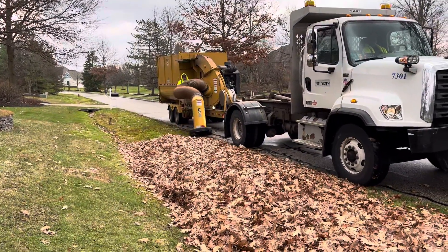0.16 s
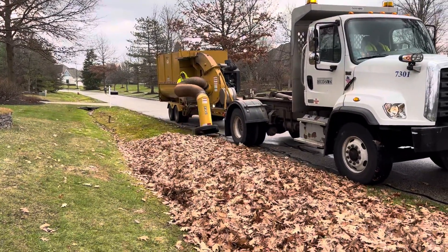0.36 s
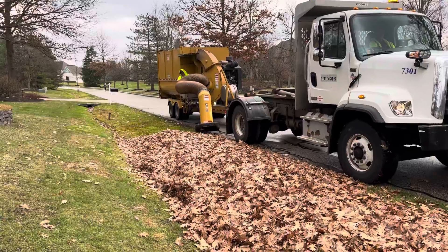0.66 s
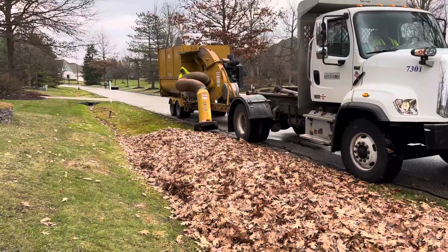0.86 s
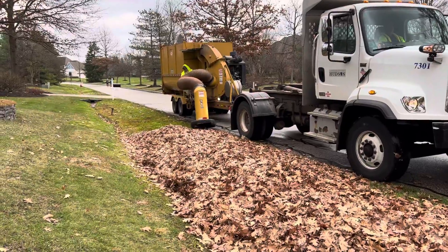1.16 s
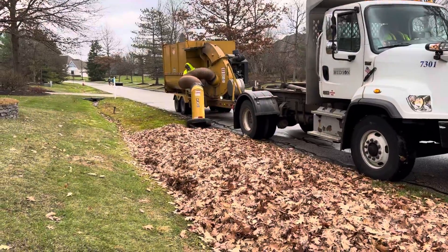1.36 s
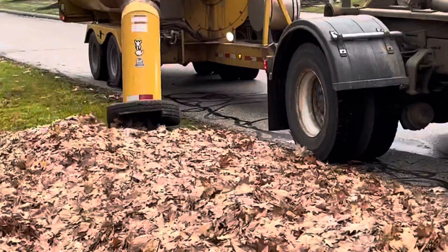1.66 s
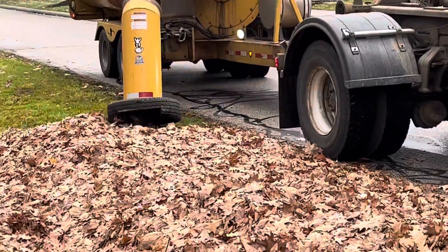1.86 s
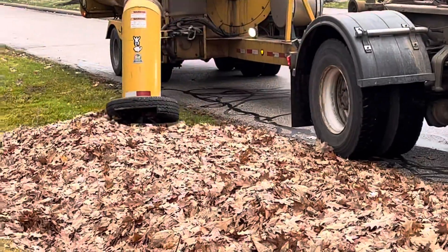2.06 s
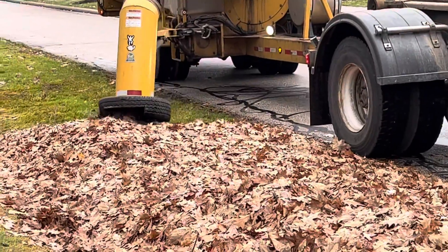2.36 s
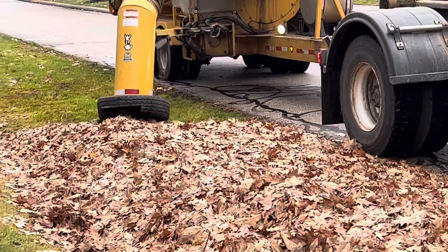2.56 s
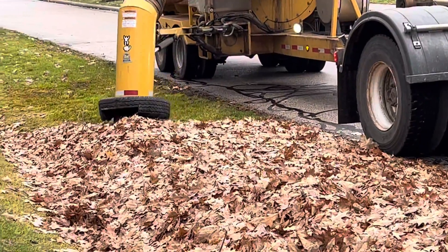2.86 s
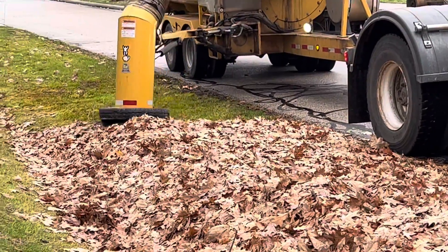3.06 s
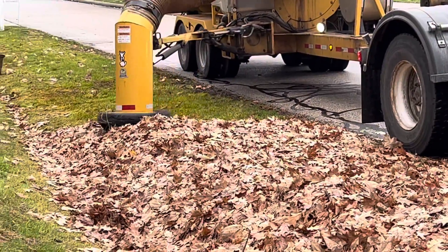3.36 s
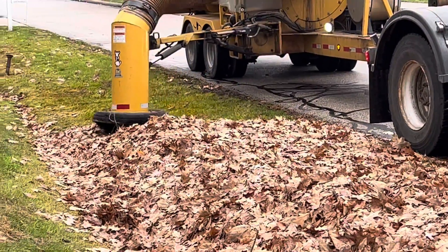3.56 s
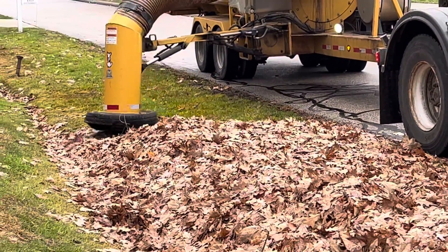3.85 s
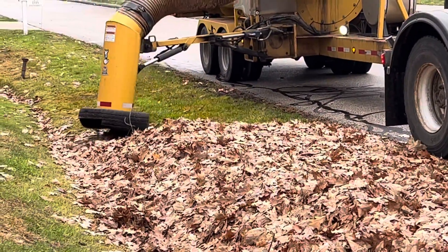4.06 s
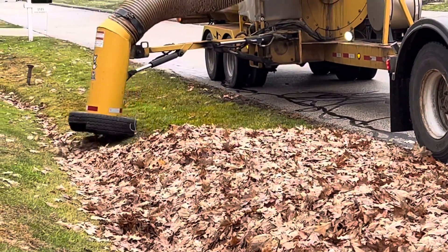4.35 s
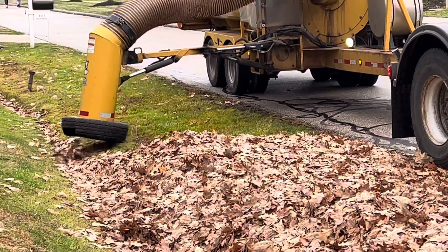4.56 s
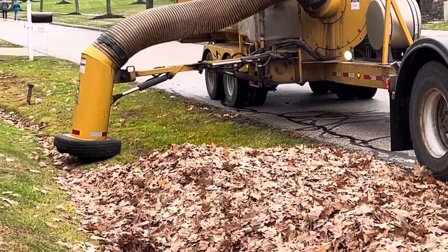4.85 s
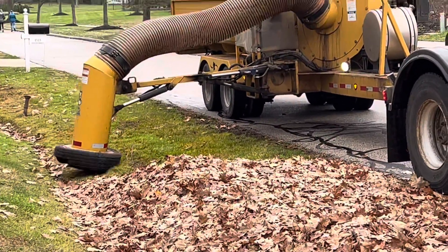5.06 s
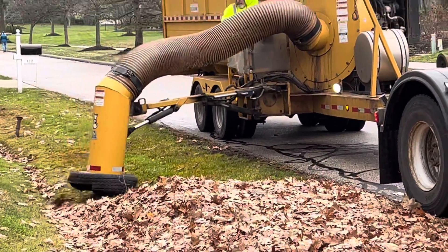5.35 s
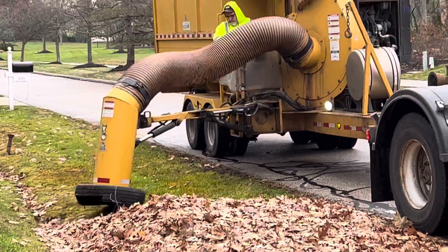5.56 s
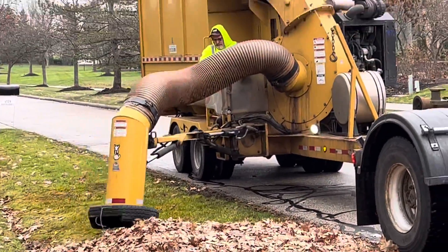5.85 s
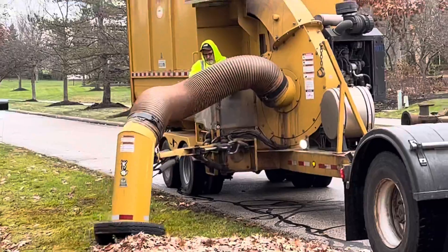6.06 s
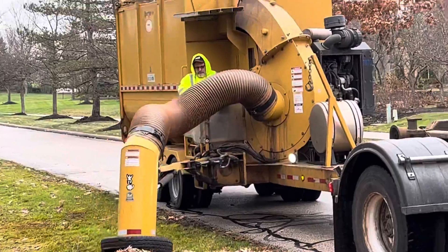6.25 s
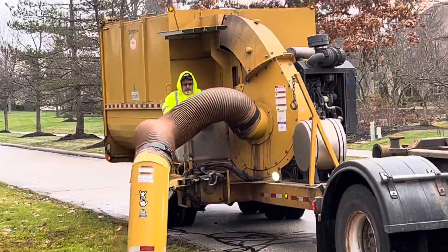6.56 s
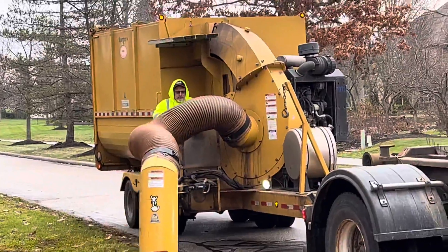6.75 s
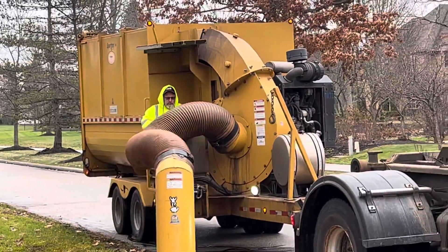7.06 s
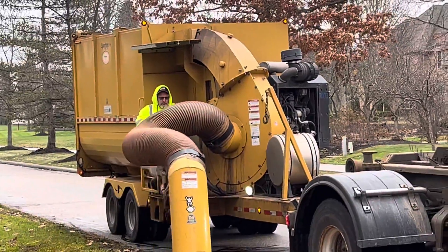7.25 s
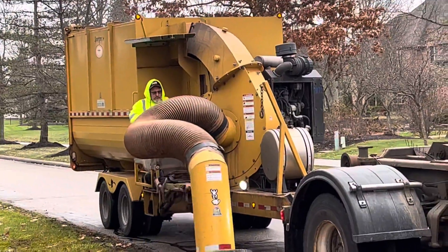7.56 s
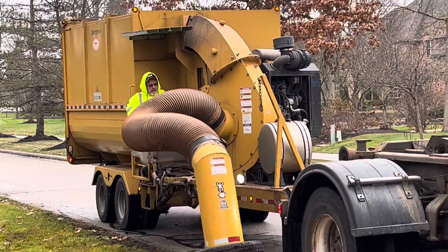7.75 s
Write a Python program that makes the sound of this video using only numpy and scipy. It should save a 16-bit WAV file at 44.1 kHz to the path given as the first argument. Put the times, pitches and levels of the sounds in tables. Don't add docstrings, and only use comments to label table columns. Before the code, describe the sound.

Outdoors at a roadside, a diesel leaf vacuum runs at constant full power: a low firing hum near 68 hertz, fan tone and broad housing roar. Suction hisses and surges as dry leaves flutter up the hose, with occasional twig cracks. Thin hydraulic whines sound early. The stereo sound begins wide, shifts abruptly at about 1.5 seconds to a more centred view, and later suffers heavy wind rumble.

```python
import sys
import numpy as np
from scipy import signal
from scipy.fft import rfft, irfft, next_fast_len
from scipy.io import wavfile
from scipy.ndimage import uniform_filter1d

SR = 44100
rng = np.random.default_rng(int(sys.argv[2]) if len(sys.argv) > 2 else 0)


def inscribe(sig):
    pcm = np.round(np.clip(np.atleast_2d(sig).T, -1, 1) * 32767)
    wavfile.write(sys.argv[1], SR, pcm.astype(np.int16))


def decibels_to_gain(level_db):
    exponent = np.asarray(level_db, float) / 20
    return 10 ** exponent


N = 348384
T = np.arange(N) / SR

# multiple of shaft [1], level/dB rms, slow waver/dB
ENGINE_ORDERS = [(2.003, -11, -0.74), (3.06, -37, 4), (4.067, -35.5, 5), (4.9, -39.5, 2), (6, -35.5, 1),
                 (7.87, -63.5, 11), (10.18, -46.5, -3), (11.14, -37, -0.5), (12.02, -36.5, 2),
                 (12.97, -44.5, -2.5), (13.84, -37.5, 0), (16.06, -45, -4), (23.7, -49.5, 0.5),
                 (27.75, -45.5, -1.5)]
# t/s, firing tone/dB (unused: no order picks it up), blade
# tone/dB (order 6)
FACING = [(0, -3.9, 0), (2, -0.2, -3), (3, 4.8, 7), (3.4, .8, -1.5), (3.8, .3, 6), (4.5, 0, 8.5), (5, 0, 0),
          (6.15, -.6, 6), (6.35, -1, 10.5), (6.68, -1.2, 12), (6.9, 2, 3.5), (7.9, -1.2, -3)]
# f/Hz, level/dB per Hz
ROAR_COLOUR = [(24, -91), (46, -77), (69, -37), (108, -42.5), (162, -48), (225, -53), (288, -56),
               (405, -52.5), (545, -53.5), (725, -63.5), (955, -60.5), (1160, -66.5), (1520, -66.5),
               (2550, -84), (11000, -83), (14000, -84.5), (15800, -82)]
# f/Hz, width/Hz, level/dB
PANEL_RINGS = [
    (955, 27, 2.5),
    (530, 15, 1.5),
    (424, 31, 2),
]
# t/s, level/dB
LOAD = [(0, 1), (1.5, 0), (2.2, 1.5), (3, 1.5), (4, 2.5), (5, 2), (6, 1), (7, -0.5), (7.9, -1)]
# t/s, level/dB
OIL_HISS = [(0, 2), (.9, -0.5), (2.3, -0.5), (2.9, 2.5), (3.15, -0.5), (4.1, 4), (5.05, 0.5), (5.5, -2.5),
            (6.45, -2), (6.8, 2), (7.15, -1), (7.35, -1), (7.6, -3.5), (7.75, 0), (7.9, -2)]
# f/Hz, level/dB per Hz
SUCTION_COLOUR = [(510, -67), (1210, -64), (2020, -65.5), (3050, -65), (4250, -69), (5550, -71.5),
                  (7050, -75), (8250, -70.5), (9250, -73), (11100, -82), (13100, -83), (15500, -107),
                  (17200, -92)]
# t/s, draw/dB, edge hiss as the mouth turns to the listener/dB
NOZZLE_SWEEP = [(0, -1.5, 3), (1.2, -1.5, 2), (1.55, -0.5, 2.5), (2.4, -.5, -0.5), (2.65, -1.5, 0),
                (3.15, -0.5, -2.5), (3.9, .5, -0.5), (4.2, 2.5, 2), (4.9, 0.5, 0), (5.45, -1, -4),
                (6.1, -0.5, -3.5), (6.3, -2, -3), (6.8, 0.5, 1), (7.2, -2.5, 1), (7.6, -1.5, 1),
                (7.9, -1.5, -1)]
# t/s, peak/dB, build/s, release/s
LEAF_GULPS = [(.32, 1.5, .04, 0.066), (.74, 0.5, .06, .03), (1.03, 1, 0.056, 0.054),
              (1.33, 0.5, 0.069, .04), (1.58, 1.5, .04, 0.027), (2.24, 3.5, 0.048, .02),
              (2.31, 5, 0.033, .03), (3.01, 3, 0.12, .03), (3.25, 0, 0.036, .04), (3.62, 1, .06, .05),
              (4.1, 1, .05, 0.056), (4.24, 0, .03, .04), (4.7, -0.5, .04, .04), (5.09, 3.5, 0.064, 0.02),
              (5.24, 2.5, .03, .05), (5.61, 3.5, 0.034, 0.034), (5.72, 3, 0.029, 0.075),
              (6.18, 1.5, .03, 0.042), (6.58, 3, 0.012, .02), (6.85, 1, .05, .04), (7.11, 2.5, .04, .03),
              (7.33, 1, 0.034, .05), (7.72, 4, .03, 0.15)]
# t/s, level/dB rms
GUSTS = [(0, -35), (.45, -34), (2.2, -41.5), (3.7, -37.5), (3.98, -26), (4.15, -28), (4.7, -22),
         (5.0, -17.5), (5.3, -16), (5.5, -20), (6.3, -23), (7.1, -23.5), (7.37, -13.5), (7.45, -20.5),
         (7.65, -21), (7.8, -17), (7.9, -20)]
# f/Hz, level/dB per Hz
WIND_COLOUR = [(21, -16), (46, 3.5), (82, 0), (155, -6.5), (310, -14), (610, -27), (1120, -38), (1620, -55)]
# t/s, peak/dB
WIND_SLAPS = [(3.954, -19), (4.549, -24), (4.885, -11.5), (4.979, -17), (5.08, -9), (5.149, -7),
              (5.212, -7), (5.599, -29), (6.099, -15), (7.049, -9), (7.231, -5), (7.269, -7), (7.309, -24),
              (7.353, 5.5), (7.73, -15), (7.788, -8)]
# t/s, f/Hz, level/dB rms
BOOM_VALVE = [(.04, 7370, -46), (.16, 7445, -37), (.47, 7700, -38), (.8, 7792, -36), (.93, 7795, -41),
              (1.15, 7798, -37), (1.6, 7768, -36), (2.08, 7798, -37), (2.3, 7840, -51)]
# start/s, length/s, start f/Hz, end f/Hz, peak/dB rms
VALVE_SQUEALS = [
    (.75, 1.45, 9725, 9915, -38),
    (1.85, .37, 9120, 9150, -46),
    (2.17, .13, 9150, 9200, -36),
    (2.27, .13, 9200, 9165, -38),
    (2.36, .18, 8805, 8868, -42),
    (7.05, .5, 9887, 9805, -43),
    (7.5, .5, 9807, 9828, -37),
]
# t/s, crack/dB, thud/dB, t60/s
CLUMP_HITS = [(1.7154, -23, -29, 0.079), (2.2303, -16, -12, 0.077), (2.296, -13, -15, 0.081),
              (2.3494, -15, -23, 0.11), (2.3925, -13, -25, 0.1), (3.0294, -23, -16, 0.09),
              (4.2258, -6.5, -23, 0.083), (4.3051, -11.5, -19, 0.098), (4.6957, -11.5, -21, 0.088),
              (5.0878, -10, -22, 0.09), (5.25, -16, -25, 0.13), (5.881, -27, -21, 0.083),
              (6.57, -10, -8.5, 0.054), (6.8009, -16, -27, 0.082), (6.851, -10.5, -17, 0.08),
              (7.7194, -24, -27, 0.09)]
# f/Hz, level/dB per Hz
CRACK_COLOUR = [(2000, -82), (2800, -69), (4000, -69), (6000, -74), (9000, -83), (12000, -105)]
# f/Hz, level/dB per Hz
THUD_COLOUR = [(500, -84), (1000, -66), (1800, -64), (2500, -68), (3500, -82), (6000, -110)]
# f/Hz, left lead/rad, left-right/dB, reflected share/dB
WIDE_PORTS = [(60, 0, -.5, -24), (300, .1, -1, -17), (690, .6, -1, -9), (1200, .3, 1.5, -9),
              (1900, .8, -3.5, -9), (2400, 1.6, -3, -9), (3000, 3.1, -1, -10), (3700, 5.4, 4, -9),
              (4300, 6.3, 6, -9), (6400, 6.3, 5.5, -8), (7500, 5.5, 1, -9), (10100, 3.1, 0, -14),
              (13300, 0, 0, -16), (16000, -2.6, 0, -10)]
# f/Hz, left lead/rad, left-right/dB, reflected share/dB
ZOOMED_PORTS = [(60, 0, -.4, -34), (300, .05, 0, -24), (600, .3, -2, -10), (1300, .05, .3, -17),
                (2300, 0, 0, -30), (3100, .3, 0, -13), (4500, .1, 0, -17), (6300, 0, 0, -24),
                (7600, -.8, 0, -20), (10100, -3.1, 0, -20), (13400, -6.3, 0, -20), (16000, -8.9, 0, -12)]
# f/Hz, level/dB
WIDE_TONE = [(100, 1), (700, 0), (2000, 1), (3000, 1.5), (4500, -2), (5500, 1), (6800, -7), (8000, -2.5),
             (12000, -1)]
# t/s, share [1]
BASS_CHOKES = [
    (5.148, 0.92),
    (5.268, 0.99),
    (6.14, .5),
    (7.335, .6),
    (7.63, 0.66),
]
# f/Hz, level/dB
STEREO_MASK = [(1000, -30), (1500, -12), (3000, -13), (5000, -14), (6500, -14), (7400, -6), (7700, -9),
               (9000, -7.5), (11000, -8), (12400, -4.5), (16000, -5)]


def evened(x):
    return x / np.sqrt(np.mean(x ** 2) + 1e-20)


def read(points, hz):
    f, *values = np.transpose(points)
    return [np.interp(np.log(hz + 1), np.log(f + 1), v) for v in values]


def curve(rows, t):
    s, *values = np.transpose(rows)
    return [np.interp(t, s, v) for v in values]


def slow(t, top_hz):
    rates_hz = np.geomspace(top_hz / 20, top_hz, 20)[:, None]
    coarse_s = np.linspace(t[0], t[-1], 2000)
    waves = np.sin(2 * np.pi * (rates_hz * coarse_s + rng.random((20, 1)))) / rates_hz ** .25
    return np.interp(t, coarse_s, evened(waves.sum(0)))


def noise(field_db, size, patchy_db):
    hop = size // 4
    t = np.arange(N // hop + 5) * hop / SR
    hz = np.fft.rfftfreq(size, 1 / SR)
    a, b, patches = rng.standard_normal((len(t), len(hz), 3)).T
    patches = evened(uniform_filter1d(uniform_filter1d(patches, 8, 0), 12, 1))
    z = (a + 1j * b) * decibels_to_gain(field_db(hz[:, None], t) + patchy_db * patches)
    per_hz = np.sqrt(1.5 * SR / size)
    return signal.istft(z, nperseg=size, noverlap=size - hop)[1][:N] * per_hz


def engine():
    shaft_hz = 34.13 * (1 + 0.001493 * slow(T, 1.997))
    turns = np.cumsum(shaft_hz) / SR
    firing_db, blade_db = curve(FACING, T)
    out = np.zeros(N)
    for order, db, waver_db in ENGINE_ORDERS:
        facing_db = {2: firing_db, 6: blade_db}.get(order, 0)
        level = decibels_to_gain(db + facing_db + waver_db * slow(T, 9.0))
        out += level * np.cos(2 * np.pi * (order * turns + rng.random()))
    return np.sqrt(2) * out


def roar():
    def field(hz, t):
        ring_db = sum(db / (1 + ((hz - f) / width) ** 2) for f, width, db in PANEL_RINGS)
        oil_share = np.clip((hz - 8500) / 2000, 0, 1)
        load_db = curve(LOAD, t)[0] * np.clip(hz / 310, 0, 1)
        oil_db = curve(OIL_HISS, t)[0]
        return read(ROAR_COLOUR, hz)[0] + ring_db + load_db * (1 - oil_share) + oil_share * oil_db
    return noise(field, size=2048, patchy_db=0.06)


def suction():
    edge_per_gulp, air_per_gulp = 0.97, .7

    def field(hz, t):
        draw_db, edge_db = curve(NOZZLE_SWEEP, t)
        gulp_db = 0
        for s, db, build_s, release_s in LEAF_GULPS:
            gulp_db = gulp_db + db * np.exp(-((t - s) / np.where(t < s, build_s, release_s)) ** 2)
        air_db = curve(OIL_HISS, t)[0] + air_per_gulp * gulp_db - 4.0
        top = np.clip((hz - 5600) / 2100, 0, 1)
        sky = np.clip((hz - 9000) / 2500, 0, 1)
        level_db = (1 - top) * (draw_db + gulp_db)
        level_db = level_db + (top - sky) * (edge_db + edge_per_gulp * gulp_db - 1.5) + sky * air_db
        flicker_db = 0.48 * slow(t, 40.0) + 0.93 * top * slow(t, 12.0)
        return read(SUCTION_COLOUR, hz)[0] + level_db + flicker_db

    air = noise(field, size=512, patchy_db=0.83)
    ticks_per_s, tick_decay_s = 100., 0.0068
    ticks = decibels_to_gain(3.36 * np.minimum(rng.exponential(1, N), 4)) * (rng.random(N) < ticks_per_s / SR)
    lift = signal.oaconvolve(ticks, np.exp(-T[:1500] / tick_decay_s))[:N]
    return air * (0.9 + 0.093 * lift)


def wind():
    def field(hz, t):
        return read(WIND_COLOUR, hz)[0] + 3.6 * slow(t, 22.0)
    own_left, own_right, shared = (evened(noise(field, size=512, patchy_db=2.0)) for _ in range(3))
    flow = np.array([own_left, own_right]) + 0.96 * shared
    t = T[::64]
    slaps = sum(decibels_to_gain(db - 8.5) * np.exp(-((t - s - .014) / 0.016) ** 2) for s, db in WIND_SLAPS)
    dull = signal.sosfilt(signal.butter(2, 330., fs=SR, output="sos"), flow)
    return decibels_to_gain(curve(GUSTS, T)[0] + 1.5) * flow + np.interp(T, t, slaps) * dull


def heave():
    band = signal.butter(3, [36, 60], "band", fs=SR, output="sos")
    left, right = evened(signal.sosfilt(band, rng.standard_normal((2, N))))
    return decibels_to_gain(1.45 * curve(GUSTS, T)[0] + 1.0) * np.array([left, left + 0.35 * right])


def whine(rows, octave_db=-60):
    first, last = round(rows[0][0] * SR), min(round(rows[-1][0] * SR), N)
    t = T[first:last]
    hz, db = curve(rows, t)
    phase_rad = 2 * np.pi * np.cumsum(hz + 2.5 * slow(t, 30.0)) / SR
    level = decibels_to_gain(db + 3.3 * slow(t, 14.0)) * signal.windows.tukey(len(t), .08)
    out = np.zeros(N)
    out[first:last] = level * (np.sin(phase_rad) + decibels_to_gain(octave_db) * np.sin(2 * phase_rad))
    return out


def squeal(start_s, length_s, start_hz, end_hz, db):
    middle_hz = start_hz + .4 * (end_hz - start_hz)
    ends_db = db - 8
    return whine([(start_s, start_hz, ends_db),
                  (start_s + length_s / 2, middle_hz, db),
                  (start_s + length_s, end_hz, ends_db)])


def clumps():
    crack, thud = np.zeros((2, N + SR))
    length = SR // 5
    for s, crack_db, thud_db, t60_s in CLUMP_HITS:
        start = round(s * SR)
        dying = decibels_to_gain(-60 * T[:length] / t60_s)
        crack[start:start + length] += decibels_to_gain(crack_db + 20) * dying
        thud[start:start + length] += decibels_to_gain(thud_db + 24) * dying
    bright = noise(lambda hz, t: read(CRACK_COLOUR, hz)[0], size=512, patchy_db=0)
    dull = noise(lambda hz, t: read(THUD_COLOUR, hz)[0], size=512, patchy_db=0)
    return crack[:N] * bright + thud[:N] * dull


def ports(x, pair):
    size = next_fast_len(N + SR // 2)
    lead_rad, balance_db, reflected_db = read(pair, np.fft.rfftfreq(size, 1 / SR))
    tails = rng.standard_normal((2, SR // 3)) * decibels_to_gain(-60 * T[:SR // 3] / .3)
    echoes = rfft(tails / np.linalg.norm(tails[0]), size) * decibels_to_gain(reflected_db)
    side = np.array([[.5], [-.5]])
    gain = np.exp(1j * side * lead_rad) * decibels_to_gain(side * balance_db) + echoes
    return irfft(rfft(x, size) * gain, size)[:, :N]


def scene():
    valves = whine(BOOM_VALVE, octave_db=-17) + sum(squeal(*row) for row in VALVE_SQUEALS)
    machine = engine() + roar() + suction() + clumps() + decibels_to_gain(4.0) * valves
    wide_gain = decibels_to_gain(read(WIDE_TONE, np.fft.rfftfreq(N, 1 / SR))[0])
    wide = irfft(rfft(machine) * wide_gain, N)
    zoom = np.clip((T - 1.455) / .01, 0, 1)
    return (1 - zoom) * ports(wide, WIDE_PORTS) + zoom * ports(machine, ZOOMED_PORTS) + wind()


def thin_stereo(x):
    faint_db = -64.5
    mid_side = np.array([x[0] + x[1], x[0] - x[1]]) / 2
    hz, t, z = signal.stft(mid_side, SR, nperseg=2048)
    band = np.arange(len(hz)) // 16
    power = np.add.reduceat(abs(z) ** 2, np.arange(0, len(hz), 16), axis=1)[:, band]
    budget_db = 1.5 * rng.standard_normal(len(t))
    kept = power >= power[::-1] * decibels_to_gain(2 * (read(STEREO_MASK, hz)[0][:, None] + budget_db))
    kept &= (power > decibels_to_gain(2 * faint_db)) | (hz < 9000)[:, None]
    mid, side = signal.istft(z * kept, SR, nperseg=2048)[1][:, :N]
    return np.array([mid + side, mid - side])


def top_cut(x):
    return signal.sosfilt(signal.butter(12, 15780, fs=SR, output="sos"), x)


def record(dry):
    guard_s, guard_rise_s, guard_share, choke_s = 7.33, 0.035, .7, .011
    heard = signal.sosfilt(signal.butter(2, 44., "high", fs=SR, output="sos"), dry)
    bass = signal.sosfiltfilt(signal.butter(2, 240., fs=SR, output="sos"), heard)
    kept = 1 - guard_share * np.clip((T - guard_s) / guard_rise_s, 0, 1)
    kept *= 1 - sum(share * np.exp(-((T - s) / choke_s) ** 2) for s, share in BASS_CHOKES)
    guarded = heard - (1 - kept) * bass + heave()
    limited = np.clip(1.25 * np.tanh(guarded / 1.25), -.88, .88)
    mix = thin_stereo(limited)
    return top_cut(mix)


dry = scene()
out = record(dry)
inscribe(out)
```